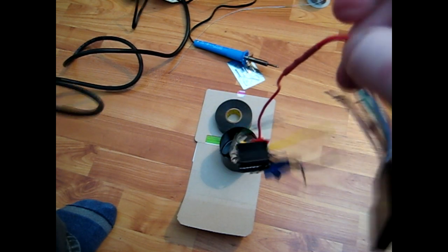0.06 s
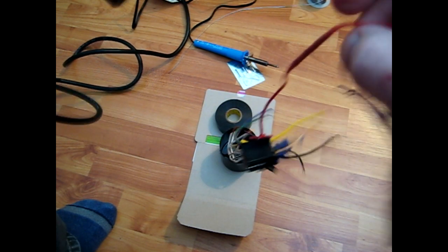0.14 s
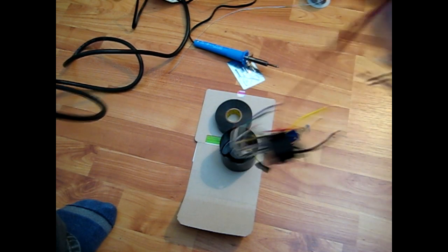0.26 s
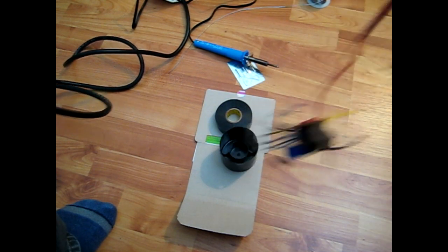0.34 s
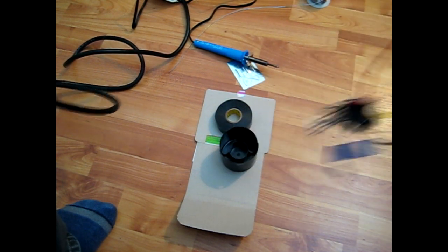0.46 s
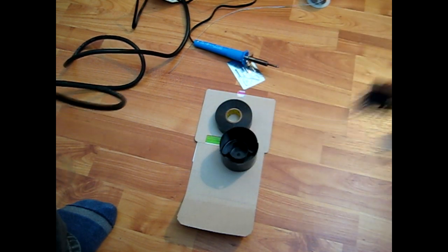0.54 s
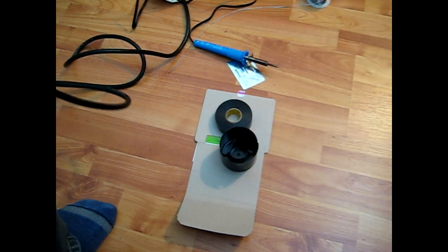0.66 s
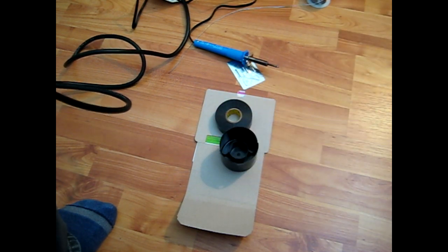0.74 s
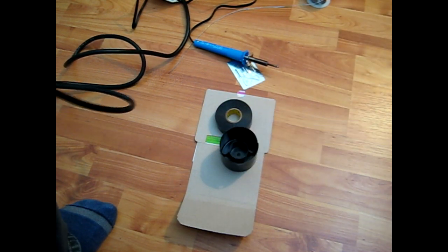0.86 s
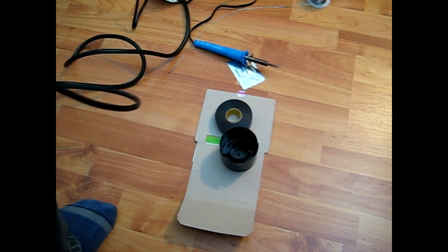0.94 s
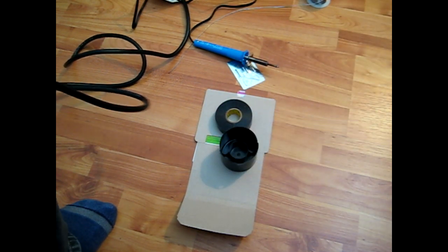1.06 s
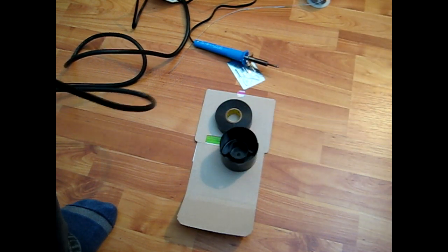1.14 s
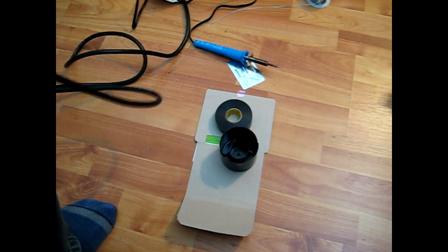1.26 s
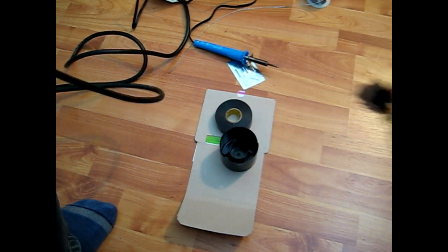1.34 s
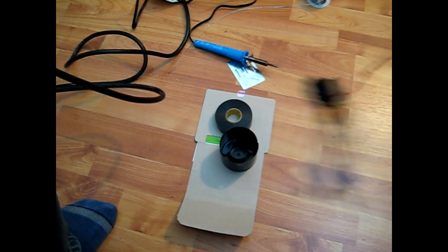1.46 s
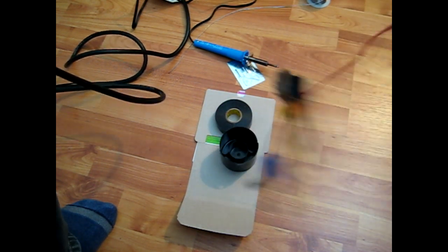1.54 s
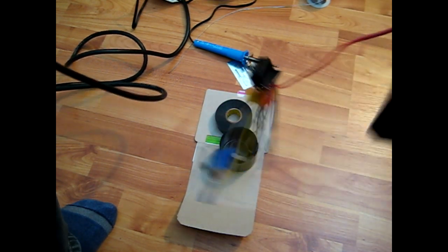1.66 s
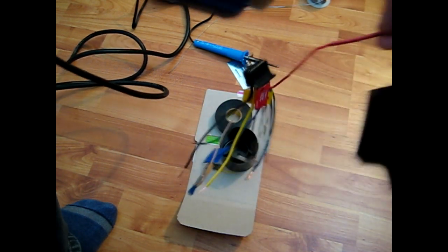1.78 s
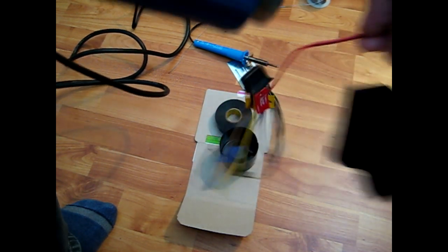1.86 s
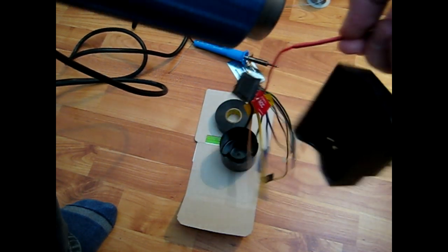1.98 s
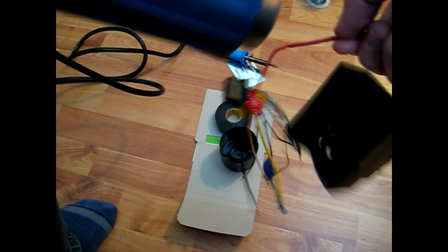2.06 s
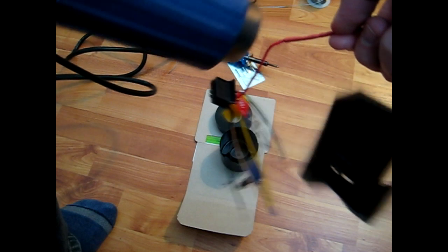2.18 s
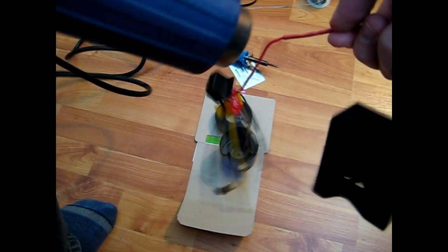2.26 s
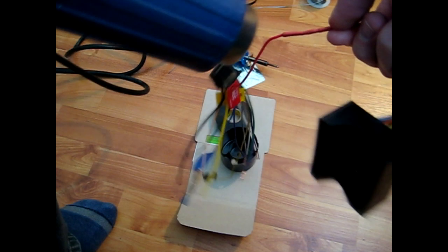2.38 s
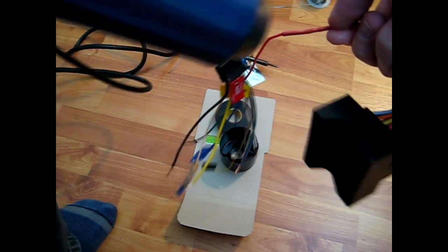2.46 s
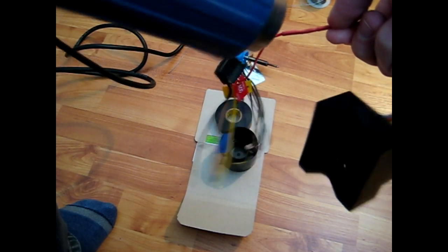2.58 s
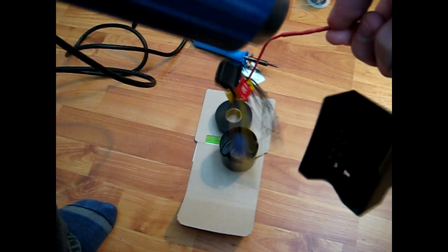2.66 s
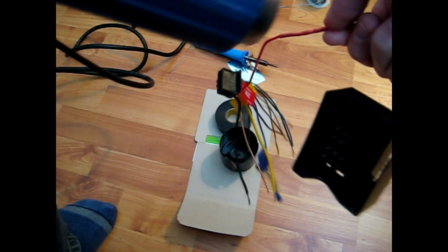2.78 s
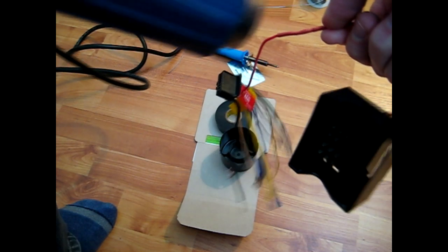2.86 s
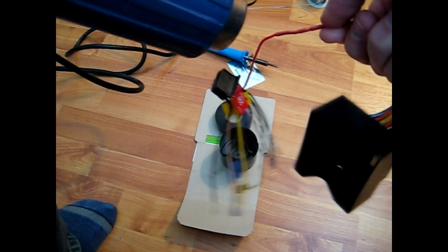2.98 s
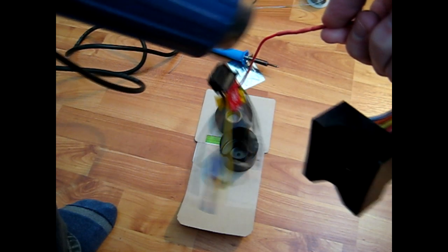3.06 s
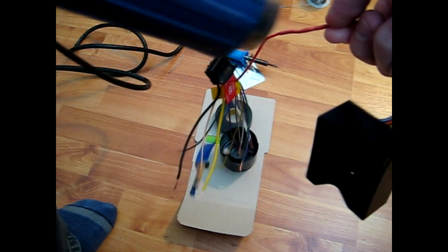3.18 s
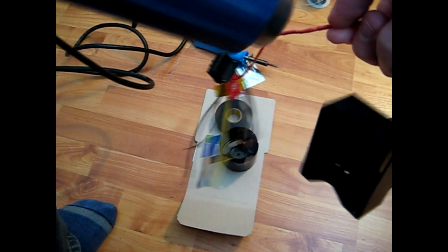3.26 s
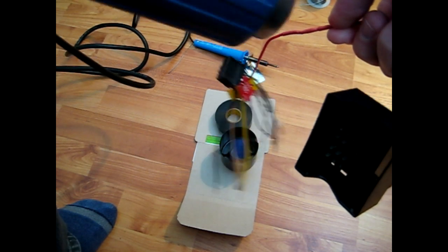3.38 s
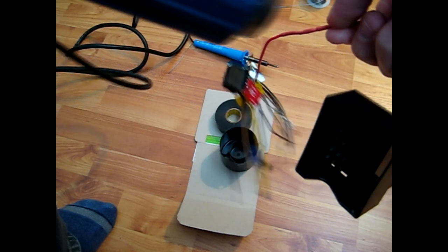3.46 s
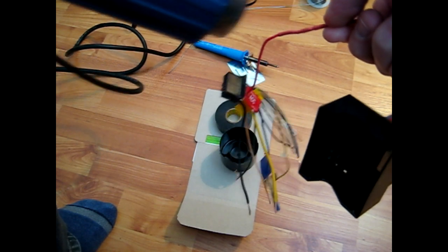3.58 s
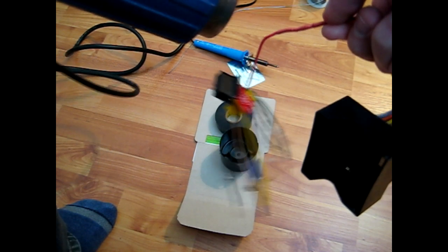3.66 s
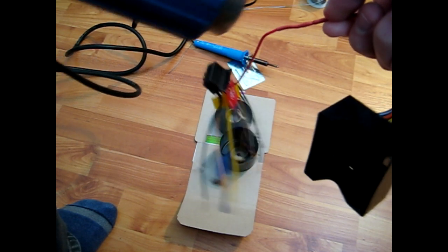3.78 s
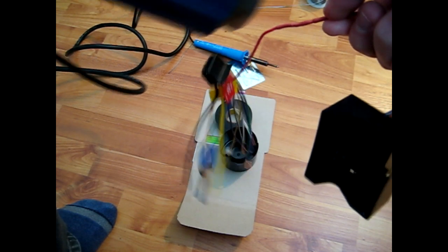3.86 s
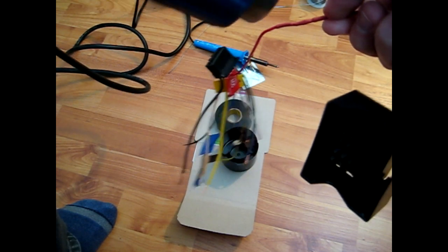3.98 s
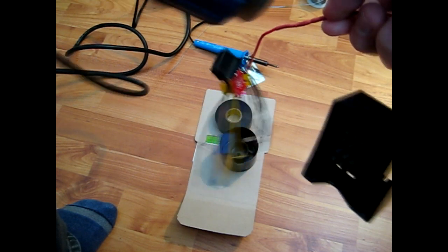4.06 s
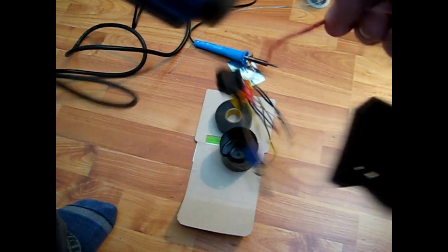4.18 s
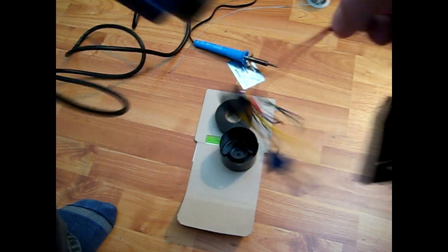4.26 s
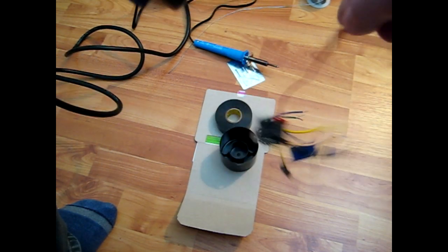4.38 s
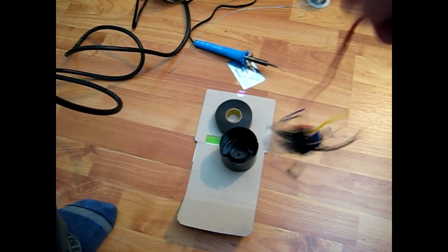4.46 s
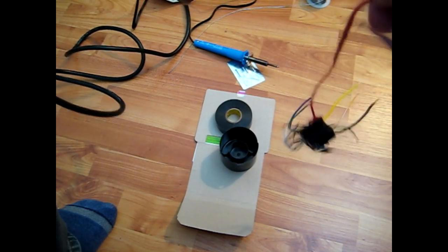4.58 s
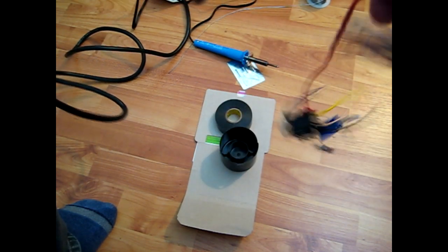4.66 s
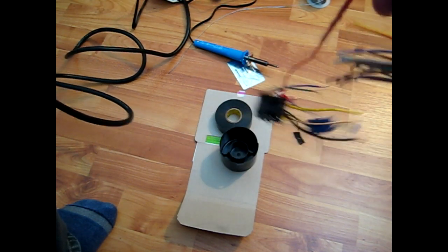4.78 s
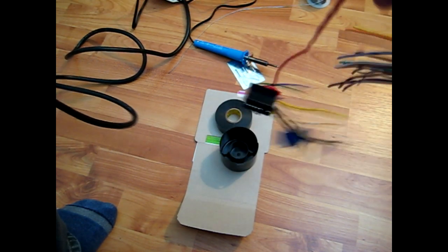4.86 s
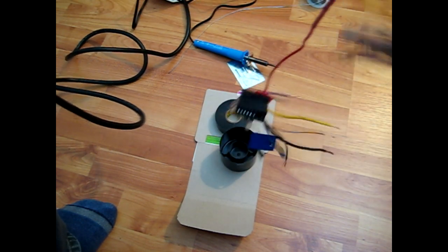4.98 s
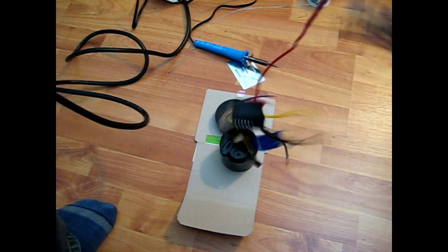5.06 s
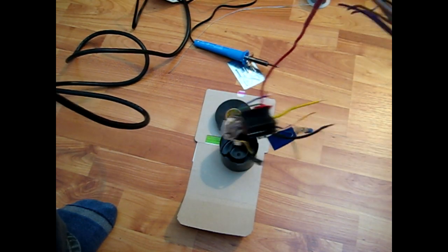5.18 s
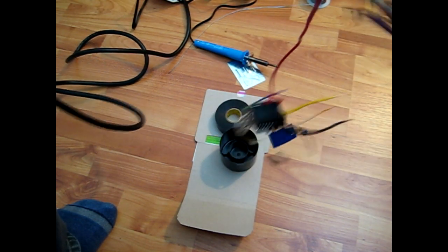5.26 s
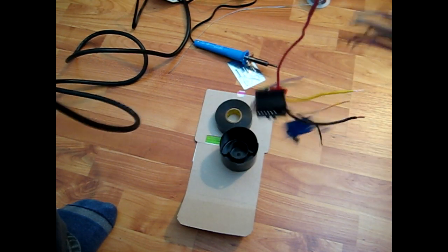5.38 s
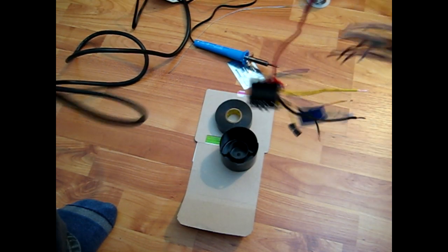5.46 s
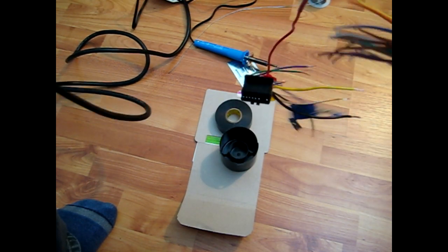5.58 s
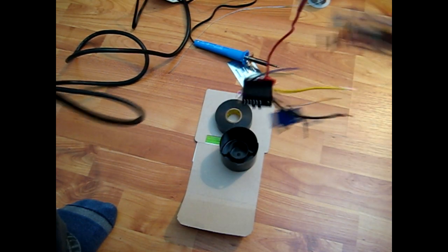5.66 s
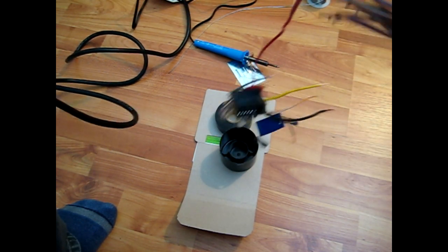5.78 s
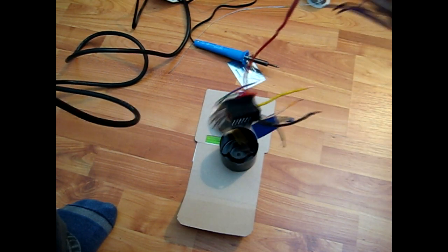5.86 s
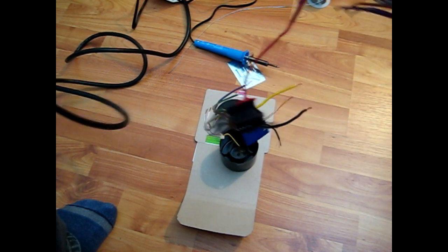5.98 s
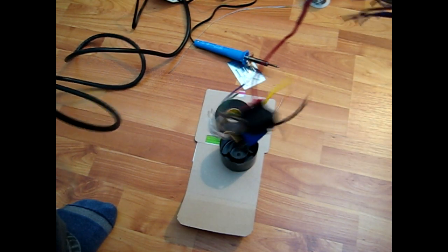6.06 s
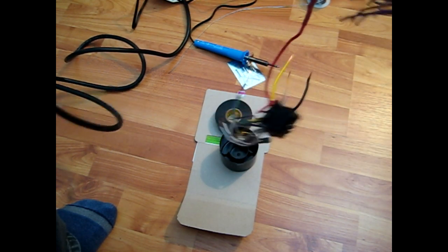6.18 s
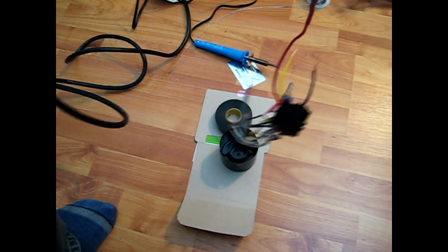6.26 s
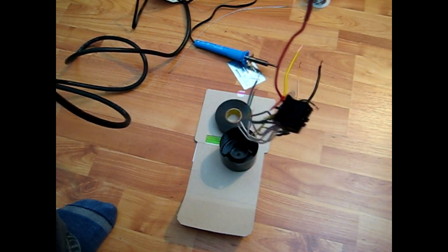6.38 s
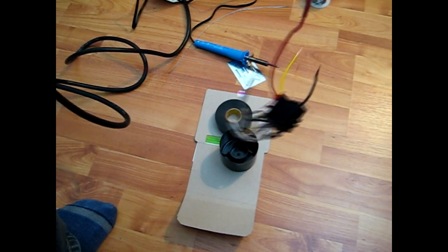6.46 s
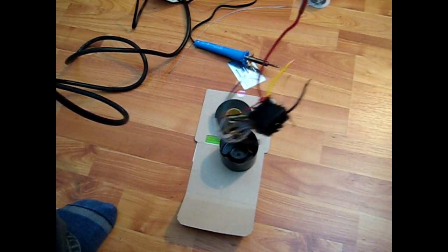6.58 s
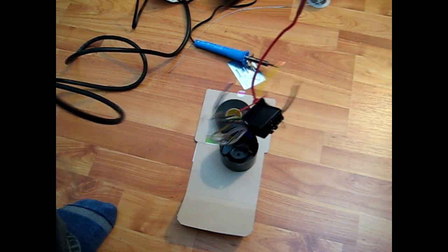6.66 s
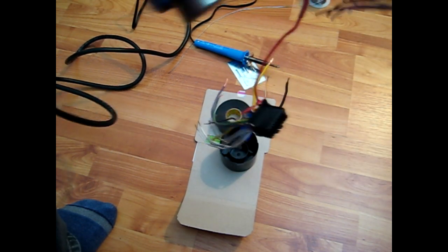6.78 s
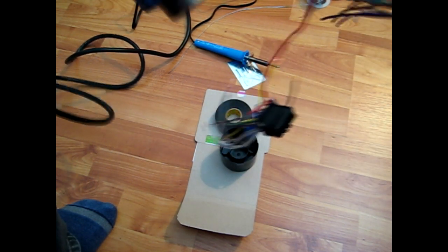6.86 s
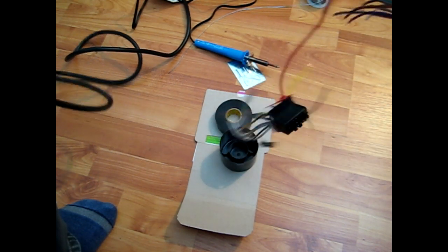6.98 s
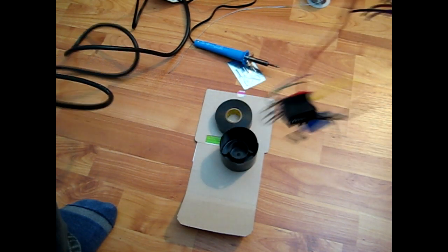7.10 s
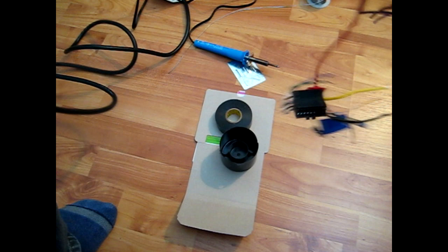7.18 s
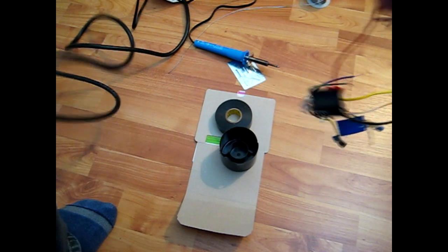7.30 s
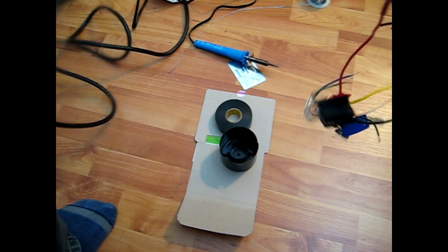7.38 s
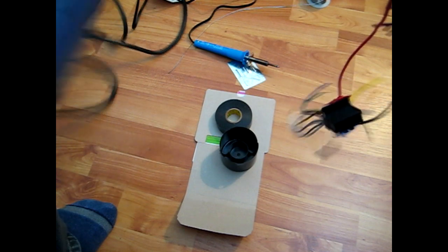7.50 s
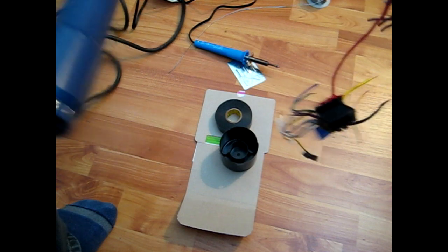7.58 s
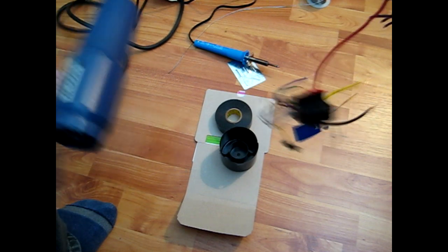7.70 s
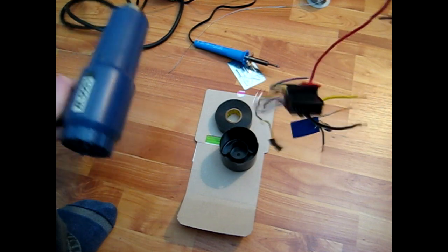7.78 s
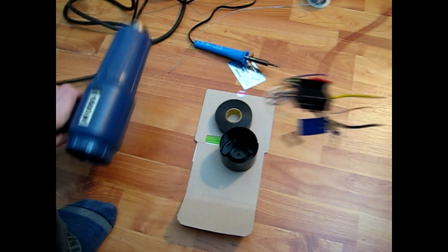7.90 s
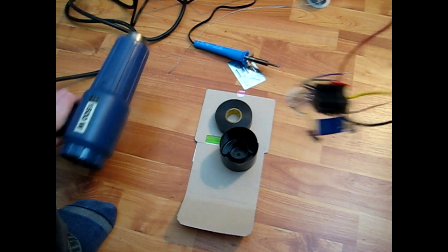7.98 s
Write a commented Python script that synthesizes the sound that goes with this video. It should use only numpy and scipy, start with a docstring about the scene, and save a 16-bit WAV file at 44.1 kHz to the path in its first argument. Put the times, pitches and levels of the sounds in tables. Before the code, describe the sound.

A heat gun blows close to the microphone in a small room, a steady roar of air with a high fan whine and a buzzing motor. Its tone shifts as it is waved about. After about six and a half seconds it switches off and falls in pitch. Still slowing, it is put down on a wooden floor with a scrape, a loud knock, a lighter tap and a thin squeak.

```python
"""A heat gun close to the microphone, over a wooden floor in a small room with a faint machine hum.
From the start it is blowing and being waved about: air roars through the barrel, an eight-blade fan
whines and the motor's brushes buzz. At 6.64 s it is switched off and coasts down. From 7.1 s, still
slowing, it is put down with a scrape, a knock that overloads the input, a lighter tap and, last,
a thin squeak."""
import sys
import numpy as np
from scipy import signal
from scipy.fft import rfft, irfft
from scipy.io import wavfile
from scipy.ndimage import uniform_filter1d

SR = 44100
rng = np.random.default_rng(int(sys.argv[2]) if len(sys.argv) > 2 else 0)


def transcribe(u):
    """Save the signal u as a 16-bit wav file named by the first command-line argument.

    u: samples, shape (n,) or (channels, n), limited to [-1, 1]; the rate is SR.
    q: integer samples, one column per channel.
    """
    v = np.clip(np.atleast_2d(u).T, -1, 1)
    q = np.round(v * 32767).astype(np.int16)
    wavfile.write(sys.argv[1], SR, q)


N = 354123
TIME = np.arange(N) / SR
FRAME_TIME = np.arange(N // 256 + 5) * 256 / SR
BIN_HZ = np.fft.rfftfreq(1024, 1 / SR)
BLADES, BAND_LIMIT_HZ = 8, 15130

# room tone: (frequency [Hz], relative level [dB])
ROOM_SPECTRUM = [(25, -21), (70, -7), (180, -7.5), (320, 2.5), (500, -2), (1100, -3), (2500, -11.5),
                 (4300, -12.5), (6500, -14), (9000, -25.5), (14500, -19.5)]
# machine hum: (frequency [Hz], level [dB]), and how far it stands out: (time [s], gain [dB])
HUM_PARTIALS = [(296, -59), (355.3, -48.5), (415, -66), (474, -61), (1010.6, -70), (1092, -81), (4204, -79),
                (7558, -60)]
HUM_GAIN = [(0, -1.5), (6.1, -3), (7.0, 6)]

# scrapes on the floor: (start [s], length [s], level [dB])
FLOOR_SCRAPES = [(7.344, 0.47, -39), (7.485, 0.03, -25)]
# their colour: (frequency [Hz], relative level [dB])
SCRAPE_SPECTRUM = [(100, -30), (400, -4), (900, 5.5), (1700, 1.5), (3000, 3), (4300, 5.5), (5800, 2.5),
                   (8000, -11), (11000, -19), (15000, -41)]
# knocks and ticks on the casing: (time [s], gain [dB], brightness [dB/octave])
CASING_BLOWS = [(7.142, -27, 7), (7.318, -26, 4), (7.4368, 5.5, 3.5), (7.4378, -9, -11), (7.4388, -7, 5.5),
                (7.4425, -21, -1), (7.5126, -18, 11), (7.7904, -6.5, -5), (7.7937, -16.5, 7),
                (7.806, -16, -2)]
# the casing's ring: (frequency [Hz], relative level [dB], t60 [s])
CASING_MODES = [(523, -41, 0.057), (791, -12.5, 0.0065), (1320, -9, 0.0054), (2580, -9, 0.0078),
                (3560, -11, 0.014), (4310, -2.5, 0.0052), (5470, -12, .006), (8400, -34, .004)]

# the motor under power: (time [s], blade tone [Hz])
BLADE_PITCH = [(0.0, 1549), (1.6, 1550), (2.43, 1560), (4.1, 1563), (4.83, 1550), (5.51, 1550),
               (5.92, 1541), (6.6, 1538)]
# the nozzle swings toward the microphone and away: (arrives [s], leaves [s], closeness [0-1])
NOZZLE_PASSES = [(0.1, 0.447, 0.5), (1.742, 4.25, 0.73), (6.7, 7.6, 1.0)]
# the floor's reflection as the gun turns: (time [s], peak frequency [Hz], peak height [dB])
FLOOR_PEAK = [(0, 5900, 3), (.28, 5460, 4.5), (.5, 4400, 2), (.75, 4000, 5), (.95, 3270, 5),
              (1.55, 3300, 1.5), (1.87, 3130, -7.5), (2.6, 3300, 0), (3.95, 3100, -6.5), (4.3, 3000, 3.5),
              (5.3, 3450, -1.5), (7.0, 3250, 1.5)]
# rise and fall of the top treble: (time [s], relative level [dB])
TREBLE_CURVE = [(0, -34), (0.9, -37), (1.9, -35), (2.35, -36.5), (4.0, -37), (5.1, -39), (5.7, -37),
                (6.0, -35.5), (6.8, -32.5)]

# the motor's stronger overtones: (frequency [x shaft speed], relative level [dB])
MOTOR_ORDERS = [(9, -43), (10, -43), (13, -39.5), (15, -38), (17, -42), (20, -39.5), (25, -41), (30, -71),
                (31, -50), (32, -51), (33, -41), (34, -64), (35, -40.5), (37, -67), (38, -59), (42, -41),
                (44, -38), (46, -53), (47, -46), (49, -44.5), (52, -43), (54, -50), (55, -42.5), (59, -46),
                (60, -78), (63, -88), (68, -64)]
# brush buzz, filling in the other overtones: (frequency [Hz], relative level [dB])
BRUSH_SPECTRUM = [(300, -78), (1000, -52), (2500, -98), (5300, -62), (7000, -44), (10000, -52),
                  (12500, -51), (15000, -65)]

# the blade tone, its octave and a lower fan tone: (time [s], level [dB])
BLADE_CURVE = [(0, -28), (.35, -45), (.75, -31.5), (1.35, -28), (2.4, -30), (5.0, -29), (6.5, -27.5)]
OCTAVE_CURVE = [(0, -26.5), (.7, -31.5), (1.0, -26), (1.85, -32.5), (2.2, -28.5), (3.7, -33), (4.6, -30),
                (6.03, -26.5), (6.25, -32)]
LOW_TONE_CURVE = [(0, -47), (1.7, -48), (2.1, -32.5), (3.9, -44.5), (4.3, -52), (5.7, -54), (6.1, -33),
                  (7.0, -41)]
# the barrel's hollow, swept by the slowing blade tone: (frequency [Hz], width [Hz], gain [dB])
BARREL_HOLLOW = (600, 170, 14)
# two high whistles:
# (frequency [x shaft speed], level [dB], gain when close [dB], coasting loss [dB/octave], fading [dB])
WHISTLES = [(40, -41, -4, 6, 3.5), (45, -41.5, 7.5, 13, 2)]

# rush of air: (frequency [Hz], relative level [dB])
RUSH_SPECTRUM = [(25, -37), (80, -25), (190, -19), (300, -10.5), (450, -3.5), (900, -2), (1700, -4),
                 (2600, -1), (4200, 1), (5600, -3), (7000, -11.5), (9500, -12.5), (12000, -22.5),
                 (14800, -29)]
# resonances and dips of the barrel: (frequency [Hz], width [Hz], gain [dB])
BARREL_RESONANCES = [(601, 390, 7), (625.6, 77, -14.5), (1106, 710, 5), (2050, 430, 3), (3050, 1150, 6.5),
                     (4548, 510, -6), (4540, 1460, 9), (5600, 250, -5.5)]
# change of colour with the nozzle at its closest: (frequency [Hz], gain [dB])
CLOSE_COLOUR = [(200, -19), (520, 6), (750, 1.5), (1100, 4.5), (2000, 0.5), (5000, -2), (6500, 5.5),
                (9000, 2.5), (14000, 1)]
# howl of the intake: (frequency [Hz], width [Hz], gain [dB])
INTAKE_HOWL = (1280, 300, 17.2)
# its rise and fall: (time [s], relative level [dB])
HOWL_CURVE = [(0, -22), (1.1, -19), (3.0, -22.5), (4.25, -18.5), (5.0, -19), (6.1, -21.5), (6.7, -21)]
# whirr of the coasting fan stirring the hollow: (frequency [Hz], width [Hz], gain [dB])
COAST_WHIRR = (650, 270, 6.8)


def gain_of(db):
    """Decibels to a factor."""
    return 10 ** (np.asarray(db) / 20)


def unit_rms(x):
    """Scales to rms 1."""
    return x / np.sqrt(np.mean(x ** 2) + 1e-20)


def unit_power(db):
    """Shifts a dB spectrum to a mean power of 1."""
    return db - 10 * np.log10(np.mean(gain_of(db) ** 2))


def follow(table, t=FRAME_TIME):
    """Every column of a curve at the times t."""
    times, *columns = np.transpose(table)
    return [np.interp(t, times, column) for column in columns]


def swing(table):
    """How far a level curve lies above its average, in dB per frame."""
    db = follow(table)[0]
    return db - db.mean()


def per_sample(frames):
    """Joins frame values by straight lines."""
    return np.interp(TIME, FRAME_TIME, frames)


def spectrum(points, at=BIN_HZ):
    """Levels in dB, joined by straight lines over log frequency."""
    hz, db = np.transpose(points)
    return np.interp(np.log(at + 1), np.log(hz + 1), db)


def bell(hz, width, height=1, at=BIN_HZ):
    """Shape of a resonance centred on hz."""
    return height / (1 + (2 * (at - hz) / width) ** 2) ** 2


def drift(rate_hz, count=1):
    """Rows of smooth random wander, rms 1, one value a frame."""
    size = len(FRAME_TIME)
    hz = np.fft.rfftfreq(size, FRAME_TIME[1])
    white = rfft(rng.standard_normal((count, size)))
    return unit_rms(irfft(white / (1 + (hz / rate_hz) ** 2), size))


def patches(frames=10, bins=9):
    """Random patches over time and frequency, rms 1."""
    field = rng.standard_normal((len(FRAME_TIME), len(BIN_HZ)))
    return unit_rms(uniform_filter1d(uniform_filter1d(field, frames, axis=0), bins, axis=1))


def noise(db):
    """Noise shaped by a dB field (frames, bins); 0 dB throughout gives rms 1."""
    white = rng.standard_normal((len(FRAME_TIME), len(BIN_HZ), 2)) @ [1, 1j]
    spectra = np.array([white, white * gain_of(db)])
    plain, shaped = signal.istft(spectra, nperseg=1024, noverlap=768, time_axis=1, freq_axis=2)[1][:, :N]
    return shaped / plain.std()


def room_tone(floor_db=-40):
    """The bed under everything: steady air noise and the hum of a small machine."""
    hum = sum(gain_of(db) * np.sin(2 * np.pi * (hz * TIME + rng.random())) for hz, db in HUM_PARTIALS)
    hum *= np.sqrt(2) * gain_of(follow(HUM_GAIN, TIME)[0])
    return noise(unit_power(spectrum(ROOM_SPECTRUM)) + floor_db) + hum


def room_echoes(x, t60, dull_hz):
    """The small room: dense, dulled reflections reach the microphone from 2 ms after the direct sound."""
    t = TIME[:SR // 2]
    tail = rng.standard_normal(len(t)) * gain_of(-60 * t / t60) * (t > .002)
    tail = signal.lfilter(*signal.butter(1, dull_hz, fs=SR), tail)
    return signal.fftconvolve(x, tail / np.linalg.norm(tail))[:N]


def squeak(start_s=7.855, db=-34.5, attack_s=0.07, hold_s=0.063, release_s=0.017, note_hz=5750):
    """A thin, nearly pure tone that scoops up to its note and wobbles around it."""
    t = np.maximum(TIME - start_s, 0)
    scoop_hz = 287 * np.exp(-t / 0.025)
    wobble_hz = 40 * np.cos(2 * np.pi * 11.2 * t)
    hz = (note_hz - scoop_hz + wobble_hz) * (1 + 0.0018 * per_sample(drift(60)[0]))
    envelope = np.minimum(t / attack_s, 1) * np.exp(-np.maximum(t - attack_s - hold_s, 0) / release_s)
    return np.sqrt(2) * gain_of(db) * envelope * np.sin(2 * np.pi * np.cumsum(hz) / SR)


def scrapes(rise_db_per_s=155, fall_db_per_s=129):
    """The cord drags over the floor: each grainy hiss swells, holds and dies away."""
    power = np.zeros(N)
    for start, length, db in FLOOR_SCRAPES:
        before, after = np.maximum(start - TIME, 0), np.maximum(TIME - start - length, 0)
        power += gain_of(db - rise_db_per_s * before - fall_db_per_s * after) ** 2
    grain_db = 2.5 * patches(frames=4, bins=18)
    return np.sqrt(power) * noise(unit_power(spectrum(SCRAPE_SPECTRUM)) + grain_db)


def knocks(crack_db=-9, crack_s=0.0032, band_hz=(450, 5500)):
    """Each blow is a crack and the short ring of the plastic casing."""
    t, out = TIME[:SR // 5], np.zeros(N)
    band = signal.butter(2, band_hz, "band", fs=SR)
    for start, db, tilt in CASING_BLOWS:
        ring = sum(gain_of(mode_db + tilt * np.log2(hz / 2000) - 60 * t / t60)
                   * np.sin(2 * np.pi * hz * t) for hz, mode_db, t60 in CASING_MODES)
        crack = gain_of(crack_db + tilt) * rng.standard_normal(len(t)) * np.exp(-t / crack_s)
        part = out[round(start * SR):][:len(t)]
        part += gain_of(db) * signal.lfilter(*band, crack - ring)[:len(part)]
    return out


def closeness(move_s=0.69):
    """How close the nozzle is to the microphone, 0-1 per frame."""
    return sum(near * np.clip(.5 + np.minimum(FRAME_TIME - arrives, leaves - FRAME_TIME) / move_s, 0, 1)
               for arrives, leaves, near in NOZZLE_PASSES)


def floor_ripple(at, width_hz=1530):
    """The bounce off the floor lifts one band and dents its neighbours, or the reverse: dB per frame."""
    peak_hz, peak_db = (column[:, None] for column in follow(FLOOR_PEAK))
    return np.cos(3 * np.pi * (at / peak_hz - 1)) * bell(peak_hz, width_hz, peak_db, at)


def reflection_sway(depth_db=2.7):
    """Shifting reflections: slow patches of colour that deepen toward the treble."""
    return depth_db * patches(frames=100, bins=11) * np.clip(BIN_HZ / 9000, 0, 1)


def treble_swing(hz):
    """Rise and fall of the top treble at the given frequencies, in dB (frames, frequencies)."""
    return swing(TREBLE_CURVE)[:, None] * np.interp(hz, [6000, 11500], [0, 1])


def shaft_speed(off_s=6.64, friction_s=0.72, drag_ratio=0.68):
    """Turns a second, per frame: nearly steady under power, then braked by bearings and air drag."""
    left = np.exp(-np.maximum(FRAME_TIME - off_s, 0) / friction_s)
    return follow(BLADE_PITCH)[0] / BLADES * left / (1 + drag_ratio * (1 - left))


def shaft(jitter=0.00023):
    """Motor speed per frame, and its turning as a unit phasor per sample; unpowered, it runs rough."""
    hz = shaft_speed()
    coast_jitter = np.interp(hz, [110, 188], [0.007, 0])
    hz = hz * (1 + jitter * drift(10.3)[0] + coast_jitter * drift(70)[0])
    return hz, np.exp(2j * np.pi * np.cumsum(per_sample(hz)) / SR)


def loudness_db(speed, knee_hz=120.6, db_per_octave=20.5):
    """The level holds at 0 dB down to a knee in shaft speed, then falls with each octave lost."""
    return db_per_octave * np.minimum(np.log2(speed / knee_hz), 0)


def motor_whine(hz, turn, trim_db=-2.5, fade_db=3.5, flicker_db=5, count=150):
    """Shaft overtones and brush buzz, each overtone fading in and out as the gun is moved about."""
    strong_db = dict(MOTOR_ORDERS)
    fades = fade_db * np.minimum(drift(2.3, count), 1.5)
    phases = np.exp(2j * np.pi * rng.random(count))
    octaves_lost = np.maximum(np.log2(hz[0] / hz), 0)
    # coasting, the overtones flicker as they sweep across the room's resonances
    flicker = flicker_db * np.interp(hz, [165, 190], [1, 0]) * (np.minimum(drift(25, count), 1.5) - .2)
    spinning = np.clip(hz / 75, 0, 1) ** 3
    out, overtone = np.zeros(N), np.ones(N, complex)
    for k in range(1, count + 1):
        overtone = overtone * turn
        db = spectrum(BRUSH_SPECTRUM, k * hz) - 0.5 * octaves_lost
        if k in strong_db:
            db = np.maximum(db, strong_db[k] - 5 * octaves_lost)
        db += trim_db + treble_swing(k * hz[:, None])[:, 0] + fades[k - 1] + flicker[k - 1]
        contact = 1 / (1 + (k / 98) ** 8)  # a brush contact lasts a set part of a turn
        envelope = gain_of(db) * contact * (k * hz < BAND_LIMIT_HZ) * spinning
        out += per_sample(envelope) * (phases[k - 1] * overtone).real
    return np.sqrt(2) * out


def fan_tones(hz, turn, waver_db=0.05, rough=0.18, coast_rough=0.2, floor_share=0.31):
    """The blades chop the air into tones, roughened by the turbulence they cut through."""
    octaves_lost = np.maximum(np.log2(hz[0] / hz), 0)
    hollow_db = bell(*BARREL_HOLLOW, at=BLADES * hz)
    tones = [(BLADES, follow(BLADE_CURVE)[0] + hollow_db - 3 * octaves_lost),
             (2 * BLADES, follow(OCTAVE_CURVE)[0] - 5 * octaves_lost),
             (5, follow(LOW_TONE_CURVE)[0])]
    for k, db, close_db, coast_db, fade_db in WHISTLES:
        fading = fade_db * np.minimum(drift(1.9)[0], 1.5)
        tones.append((k, db + close_db * closeness() - coast_db * octaves_lost + fading))
    roughness = rough + coast_rough * np.minimum(2 * octaves_lost, 1)
    out = np.zeros(N)
    for k, db in tones:
        bounce_db = floor_share * floor_ripple(k * hz[:, None])[:, 0]
        envelope = gain_of(db + loudness_db(hz) + bounce_db + waver_db * drift(5.1)[0])
        turbulence = [1, 1j] @ drift(32, count=2)
        out += (per_sample(envelope * (1 + roughness * turbulence)) * turn ** k).real
    return np.sqrt(2) * out


def air_rush(jet_db=-18.5, eddy_db=1.05, flutter_db=0.57, rasp=0.58):
    """Turbulence rings the barrel; its colour shifts as the gun turns and nears the microphone."""
    speed = shaft_speed()[:, None]
    octaves = np.log2(np.maximum(BIN_HZ, 300) / 2000)
    barrel = sum(bell(*resonance) for resonance in BARREL_RESONANCES)
    howl_hz, howl_width, howl_db = INTAKE_HOWL
    intake = bell(howl_hz, howl_width)
    colour = unit_power(spectrum(RUSH_SPECTRUM) + 0.17 * octaves + barrel + howl_db * intake)
    stalled = np.interp(speed, [88, 150], [1, 0])
    colour = colour - stalled * howl_db * intake  # the howl needs a fast flow
    aim = closeness()[:, None] * spectrum(CLOSE_COLOUR) + floor_ripple(BIN_HZ) + reflection_sway()
    aim += swing(HOWL_CURVE)[:, None] * intake + treble_swing(BIN_HZ)
    # the coasting fan stirs the hollow of the barrel and sounds duller
    coasting = np.interp(speed, [50.4, 75, 132, 169], [0, 1, 1, 0])
    whirr = coasting * (bell(*COAST_WHIRR) - 2.3 * stalled * octaves)
    # the rasp of the brushes outlasts the rush
    level = jet_db + loudness_db(speed) * (1 - rasp * bell(8000, width=7800))
    turbulence = eddy_db * patches() + flutter_db * drift(26).T
    return noise(colour + level + aim + whirr + turbulence)


def air_throb(hz, turn, depth=0.29):
    """The slower the fan, the more its rush throbs once a turn."""
    return 1 + depth * per_sample(1 - hz / hz[0]) * turn.real


def scene():
    """Room, handling sounds and gun at one microphone, the same in both channels."""
    hz, turn = shaft()
    fan, motor = fan_tones(hz, turn), motor_whine(hz, turn)
    handling = knocks() + squeak()
    echoes = room_echoes(gain_of(-22) * fan + gain_of(-11) * motor, t60=0.85, dull_hz=9350)
    echoes += gain_of(-19) * room_echoes(handling, t60=0.32, dull_hz=5500)
    rush = air_rush() * air_throb(hz, turn)
    mono = rush + fan + motor + handling + echoes + scrapes() + room_tone()
    return np.array([mono, mono])


def record(dry):
    """The loudest knock overloads the microphone input; a steep low-pass then limits the band."""
    clipped = dry / (1 + dry ** 6) ** (1 / 6)
    lowpass = signal.firwin(511, BAND_LIMIT_HZ, window=("kaiser", 9), fs=SR)
    return signal.oaconvolve(clipped, lowpass[None], "same")


dry = scene()
out = record(dry)
transcribe(out)
```